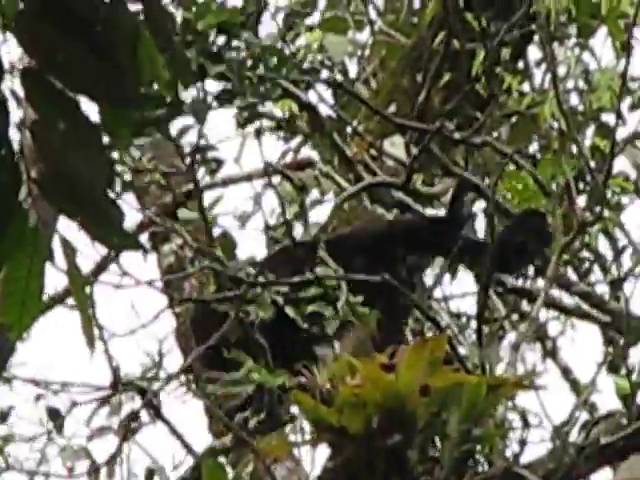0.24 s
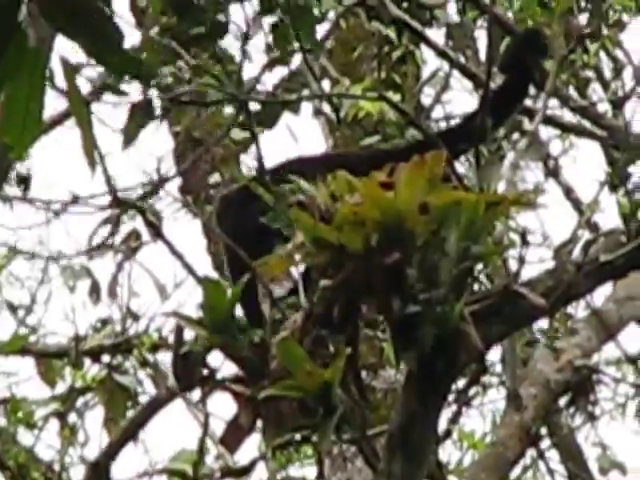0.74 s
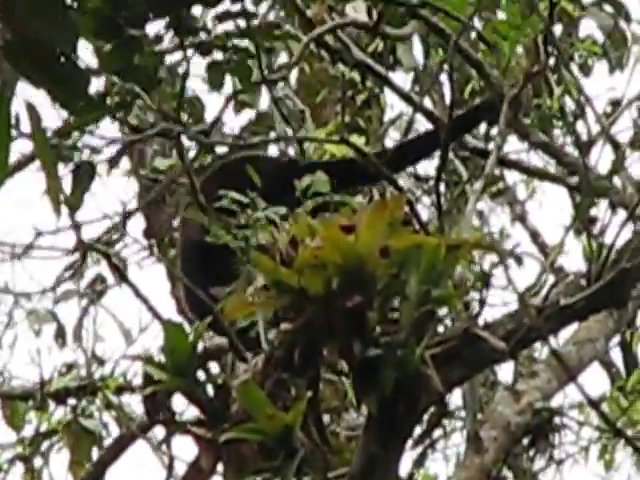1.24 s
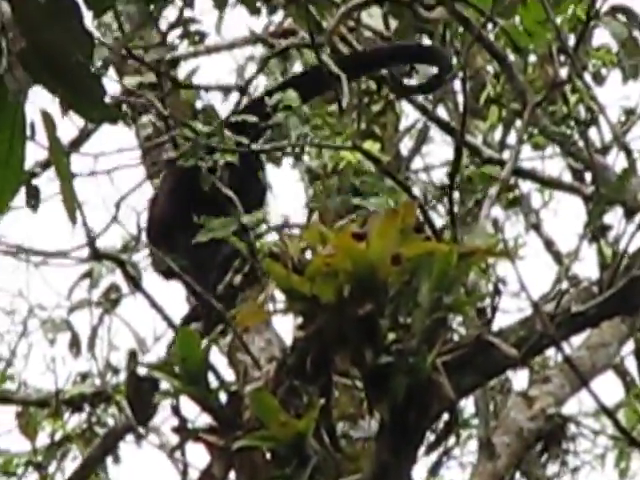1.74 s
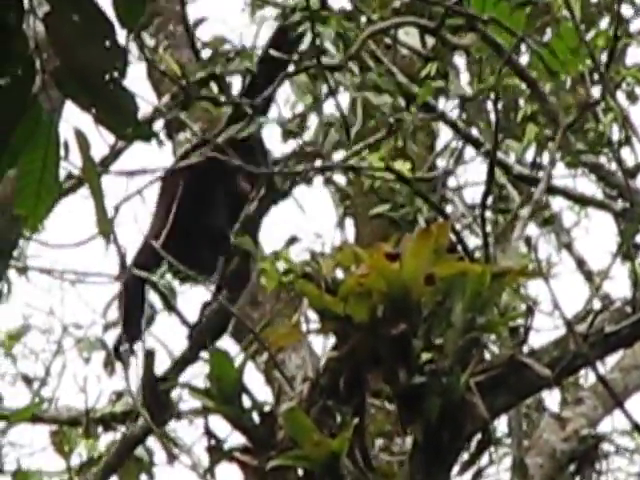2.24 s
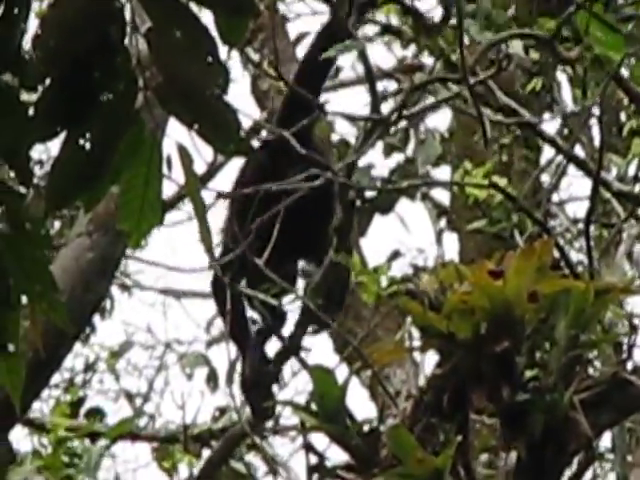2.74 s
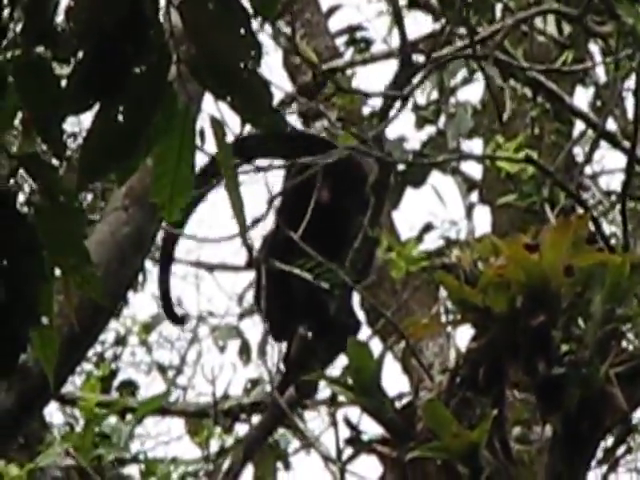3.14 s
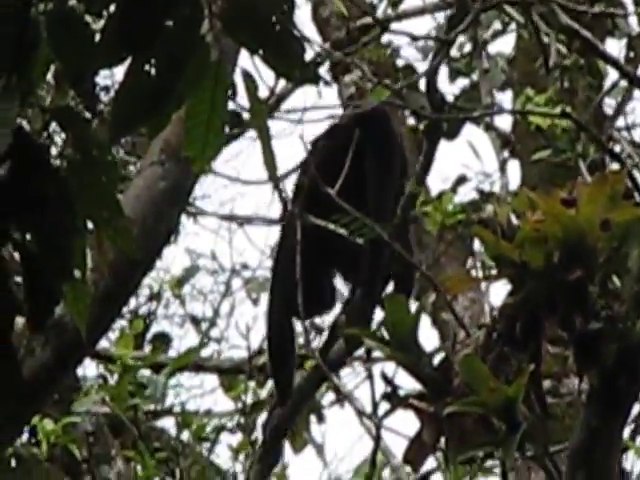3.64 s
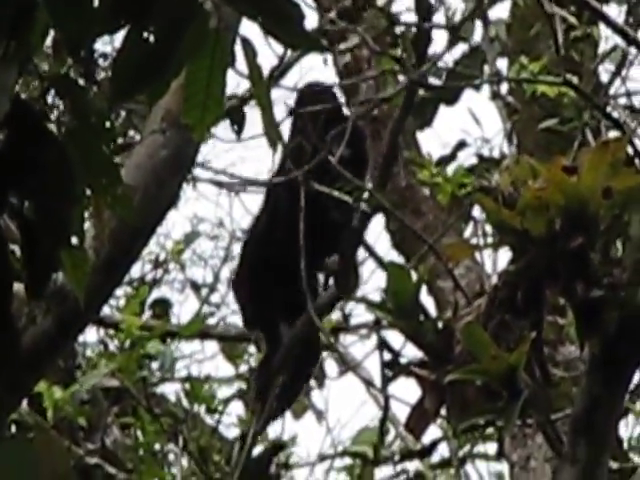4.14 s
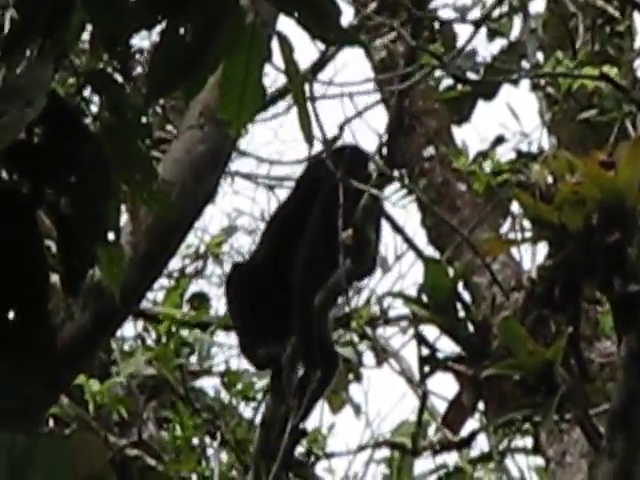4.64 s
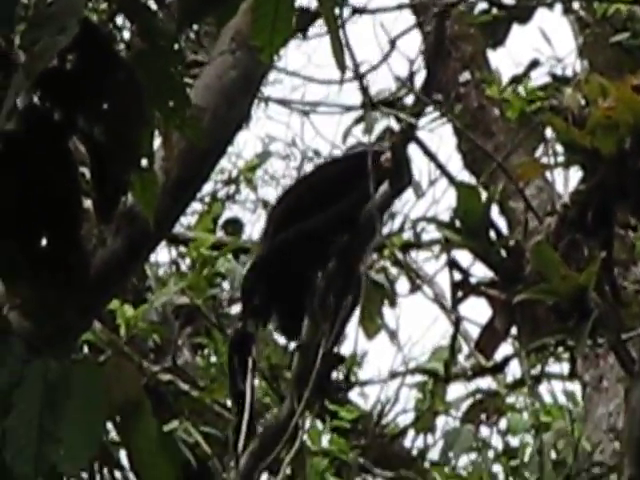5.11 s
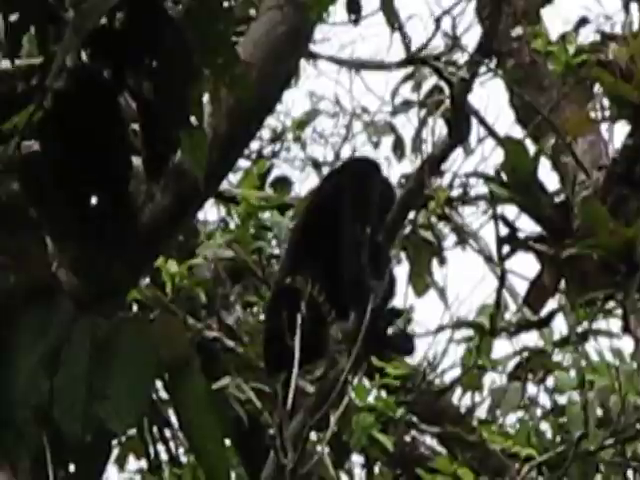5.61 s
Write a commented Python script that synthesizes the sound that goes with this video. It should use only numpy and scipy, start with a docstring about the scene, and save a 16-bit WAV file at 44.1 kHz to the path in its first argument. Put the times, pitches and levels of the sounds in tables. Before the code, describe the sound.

A howler monkey calls from a rainforest tree, a little left of centre, with a short scattered echo from trunks and leaves. The sound opens in the middle of a harsh bark; more raspy, unsteady barks follow at about 0.2, 0.45, 0.75 and 1.2 s, with a short grunt and hoarse ringing overtones. From 1.5 s the animal is quiet, apart from a faint hum near 2.75 s. At 3.3 s a weak hoot starts a new bout; hoots at 3.6 and 3.85 s are stronger, and from 4.1 s full, hollow, cleaner hoots pulse about three times a second to the end, with brief grunts and hums between. A small dry twig crack comes at 4.3 s. Throughout, cicadas make an even, very high hiss, a high cricket trill pulses fast and slowly fades, and a katydid scrapes about five times a second until 5.7 s, over low, soft forest air.

```python
"""A howler monkey calls in a rainforest tree: harsh barks, a pause, then hoots that build up.
Each call mixes a chaotic rasp of the vocal folds with the note of the throat sac; the note is
cleaner where the sac outweighs the rasp. Short grunts, soft hums and extra ringing tones join in.
Shaped noise makes hissing cicadas, a rasping katydid, a snapping twig and forest air.
A pulsing tone makes a trilling cricket, and a fading noise tail makes the echo from the trees."""
import sys
import numpy as np
from scipy import signal
from scipy.fft import rfft, irfft, next_fast_len
from scipy.io import wavfile
from scipy.ndimage import uniform_filter1d, minimum_filter1d, map_coordinates

SR = 44100
rng = np.random.default_rng(int(sys.argv[2]) if len(sys.argv) > 2 else 0)


def wav_out(sig):
    """Save sig, one row per channel (or a flat mono array), as 16-bit PCM at SR to the path in sys.argv[1]."""
    wavfile.write(sys.argv[1], SR, np.round(np.clip(np.atleast_2d(sig).T, -1, 1) * 32767).astype(np.int16))


N = 258867
T = np.arange(N) / SR  # time of every sample (s)


def amp(db):
    """Turn decibels into a plain multiplier."""
    return 10 ** (np.asarray(db) / 20)


def unit(x):
    """Scale a sound to an average (rms) level of 1."""
    return x / np.sqrt(np.mean(x ** 2) + 1e-20)


def along(points, hz):
    """Read a curve of (pitch_hz, value) points on a log pitch axis."""
    point_hz, value = np.transpose(points)
    return np.interp(np.log(hz + 1), np.log(point_hz + 1), value)


def over_time(points):
    """Read a curve of (time_s, value) points at every sample."""
    return np.interp(T, *np.transpose(points))


def wobble(rate):
    """A smooth random curve of rms 1, with about this many random points a second."""
    knots = rng.standard_normal(int(N * rate / SR) + 4)
    return unit(signal.resample(knots, next_fast_len(N))[:N])


def filtered(x, response):
    """Multiply the spectrum of a sound by a response that depends on frequency."""
    size = next_fast_len(N + SR // 2)
    spectrum = rfft(x, size) * response(np.fft.rfftfreq(size, 1 / SR))
    return irfft(spectrum, size)[..., :N]


def coloured(x, spectrum):
    """Colour a sound with (pitch_hz, level_db) points, at rms 1."""
    return unit(filtered(x, lambda hz: amp(along(spectrum, hz))))


def resonate(x, modes):
    """Ring a sound through steep-sided (pitch_hz, width_hz, level_db) resonances, at rms 1."""
    def response(hz):
        total = 0
        for centre_hz, width_hz, db in modes:
            damping = 1.5j * hz * width_hz
            # squaring makes the sides steep
            total = total + amp(db) * (damping / (centre_hz ** 2 - hz ** 2 + damping)) ** 2
        return total
    return unit(filtered(x, response))


def noise_pair(alike):
    """Left and right noise, mixed from a shared and an opposite part to set their likeness."""
    def shares(hz):
        turn = np.arccos(np.clip(along(alike, hz), -1, 1)) / 2
        return np.array([np.cos(turn), np.sin(turn)])
    mid, side = filtered(rng.standard_normal((2, N)), shares)
    return np.array([mid + side, mid - side])


def swell(start, length):
    """A rounded rise and fall, silent outside its length."""
    return np.abs(np.sin(np.pi * np.clip((T - start) / length, 0, 1))) ** 0.32


def cycle(hz):
    """Add up a pitch curve into a running phase."""
    return 2 * np.pi * np.cumsum(hz) / SR


def glide(start, length, start_hz, end_hz, jitter):
    """Phase of a short, unsteady note that goes from one pitch to another."""
    hz = np.interp(T, [start, start + length], [start_hz, end_hz])
    return cycle(hz * (1 + jitter * wobble(160)))


def rough_note(phase, chaos, rate):
    """A tone of rms 1, from pure (chaos 0) to a random flutter (chaos 1)."""
    flutter = np.sqrt(2) * (1 - chaos) + chaos * (wobble(rate) + 1j * wobble(rate))
    return np.real(flutter * np.exp(1j * phase)) / np.hypot(1 - chaos, chaos)


# colour of the forest air: pitch_hz, level_db
FOREST_COLOUR = [(20, -38), (36, -13), (70, -5.5), (160, -4.5), (700, -5.3), (1250, -7), (1900, -12.5),
                 (4600, -9), (5300, -14.5), (9000, -84)]
# likeness of left and right, for the air and the echo: pitch_hz, likeness (1 = the same)
FOREST_LIKENESS = [(100, 1), (1200, 0.74), (4000, 0.14)]


def forest():
    """Leaves and far air are coloured noise; a thin insect whine and a low hum are narrow resonances."""
    breeze = amp(.4 * wobble(3))
    air = amp(-44) * breeze * coloured(noise_pair(FOREST_LIKENESS), FOREST_COLOUR)
    whine = amp(-58) * resonate(rng.standard_normal((2, N)), [(2619, 27, 0)])
    hum = amp(-64) * resonate(rng.standard_normal(N), [(121.2, 3.4, 0)])
    return air + whine + hum


# colour of the hiss: pitch_hz, level_db
CICADA_COLOUR = [(5600, -23.5), (6100, -15.5), (6600, -12), (8000, -1), (9100, 2), (10500, -1.5),
                 (11500, -9), (13000, -23), (15000, -35.5), (16000, -37)]
# loudness of the hiss before the trim: time_s, level_db
CICADA_LOUDNESS = [(0.0, -34.5), (5.87, -34)]


def cicadas(trim_db=4):
    """Countless far insects merge into an even hiss that leans slowly from right to left."""
    # (pitch_hz, likeness of left and right)
    hiss = coloured(noise_pair([(6000, -0.00063), (9000, -0.4), (13000, 0.094)]), CICADA_COLOUR)
    lean_db = np.interp(T, [0, 5.87], [-.3, .5])
    return hiss * amp(over_time(CICADA_LOUDNESS) + trim_db + np.array([lean_db, -lean_db]))


# loudness of the trill before the trim: time_s, level_db
CRICKET_LOUDNESS = [(0.0, -43), (1.75, -46), (5.87, -52.5)]
# moments near which the trill rests briefly: time_s
CRICKET_PAUSES = [.6, 1.23, 2.34, 2.65]


def cricket(rate_hz=52.3, pitch_hz=5010, trim_db=3):
    """A trill of quick, ringing wing strokes with brief rests: a high tone that pulses."""
    stroke_phase = cycle(rate_hz * (1 + 0.0079 * wobble(4.38)))
    strokes = 0.21 + 0.73 * (.5 + .5 * np.sin(stroke_phase)) ** 2
    rests = sum(swell(s - .04, 0.056) for s in CRICKET_PAUSES)
    playing = np.clip(1 - rests, 0, 1)
    phase = cycle(pitch_hz * (1 + 0.00594 * wobble(300)))
    # left and right are a quarter cycle apart
    tone = np.sqrt(2) * np.array([np.sin(phase), np.cos(phase)])
    wings = tone * amp(1.5 * wobble(50))
    return wings * strokes * playing * amp(over_time(CRICKET_LOUDNESS) + trim_db)


# pace of the wings: time_s, strokes so far (count)
KATYDID_PACE = [(.07, 0), (2.93, 15), (4.14, 21), (5.68, 29)]


def katydid(sharpness=3.1, stroke_db=-45.5, back_db=-54):
    """Broad scraping strokes, about five a second, with a thinner, higher back stroke between them."""
    turn = np.pi * over_time(KATYDID_PACE)
    playing = (T > KATYDID_PACE[0][0] - .02) * (T < KATYDID_PACE[-1][0] + .02)
    colour = [(2600, -48), (3400, -3), (3900, 1), (4250, 0), (4700, -7), (5500, -53)]  # (Hz, dB)
    scrape = coloured(rng.standard_normal((2, N)), colour)
    back = resonate(rng.standard_normal((2, N)), [(4530, 200, 0)])
    strokes = amp(stroke_db) * np.abs(np.cos(turn)) ** (2 * sharpness) * scrape
    back_strokes = amp(back_db) * np.sin(turn) ** 4 * back
    return uniform_filter1d(1.0 * playing, SR // 20) * (strokes + back_strokes)


# how long the echo takes to fade by 60 dB: pitch_hz, fade_s
TREE_FADE = [(350, 1), (900, 0.66), (5000, 0.45)]


def trees(x):
    """Trunks and leaves scatter the sound back, differently to each side in the treble."""
    noise = noise_pair(FOREST_LIKENESS)[:, :SR]
    hz, t, grid = signal.stft(noise, SR, nperseg=256)
    fade = amp(-60 * t / along(TREE_FADE, hz)[:, None])
    tail = signal.istft(grid * fade, SR, nperseg=256)[1]
    late = np.pad(x, (SR // 80, 0))[None]  # 12.5 ms on the way
    return signal.fftconvolve(late, tail / np.linalg.norm(tail[0]), axes=1)[:, :N]


def twig(start=4.327, db=-32, fade_s=0.048):
    """A small dry crack in the branches: noise through two wood resonances, fading 60 dB in fade_s."""
    age = np.maximum(T - start, 0)
    wood = resonate(rng.standard_normal(N), [(1989, 590, 14), (2589, 870, -1)])
    return amp(db - 60 * age / fade_s) * (T > start) * wood


# short voiced grunts: start_s, length_s, start_pitch_hz, end_pitch_hz, level_db
GRUNT_NOTES = [(0.115, 0.17, 252, 258, -33.5), (4.366, 0.076, 266, 286, -29),
               (4.677, 0.06, 278, 283.4, -28), (5.03, 0.074, 264, 247.2, -32),
               (5.605, .07, 240, 227.8, -36)]
# overtones of a grunt: multiple of its pitch, level_db
GRUNT_OVERTONES = [(1, 9.5), (2, 13.5), (3, 14), (4, -17.5), (5, -22)]
# soft hums of the sac: start_s, length_s, start_pitch_hz, end_pitch_hz, level_db
SAC_HUMS = [(2.751, 0.087, 200, 214, -42), (4.373, 0.082, 338, 310, -25), (4.703, .08, 331, 319, -24.5)]


def grunts():
    """Short hoarse grunts stack unsteady overtones and noise; soft hums of the sac are single tones."""
    out = np.zeros(N)
    for s, length, start_hz, end_hz, db in GRUNT_NOTES:
        phase = glide(s, length, start_hz, end_hz, jitter=0.0248)
        voice = sum(amp(level + 4.1 * wobble(70)) * np.sin(k * phase) for k, level in GRUNT_OVERTONES)
        hoarse = coloured(rng.standard_normal(N), HOOT_THROAT_COLOUR)
        out += amp(db) * swell(s, length) * (unit(voice) + 0.14 * hoarse)
    for s, length, start_hz, end_hz, db in SAC_HUMS:
        tone = unit(np.sin(glide(s, length, start_hz, end_hz, jitter=0.0206)))
        out += amp(db) * swell(s, length) * tone
    return out


# extra ringing tones in the barks and the first grunt; the one near 900 Hz is a steady mouth resonance:
# start_s, length_s, start_pitch_hz, end_pitch_hz, level_db
EXTRA_TONES = [(-.03, 0.077, 3530, 3350, -43.5), (-.02, 0.053, 2150, 2060, -42),
               (0.124, .12, 1038, 857, -33.5), (.235, .085, 2080, 2310, -45.5),
               (0.21, 0.082, 3070, 3250, -49.5), (0.467, 0.12, 903, 900, -28),
               (0.528, 0.146, 3720, 3630, -53), (.823, 0.12, 4965, 4866, -47.5),
               (1.24, 0.094, 4380, 3950, -42.5)]


def ringing_tones():
    """Extra hoarse tones, most sliding, one steady near 900 Hz; higher ones flutter more, up to a limit."""
    out = np.zeros(N)
    for s, length, start_hz, end_hz, db in EXTRA_TONES:
        phase = glide(s, length, start_hz, end_hz, jitter=0.029)
        out += amp(db) * swell(s, length) * rough_note(phase, chaos=min(start_hz / 3000, .75), rate=200)
    return out


def arch(age, length, attack, rise_db, fall_db, bend):
    """Gain of a call that climbs to a crest and falls away; silent outside softened edges."""
    rising = np.clip(1 - age / attack, 0, 1)
    falling = np.clip((age - attack) / max(length - attack, .01), 0, 1)
    sounding = uniform_filter1d(1.0 * (age >= 0) * (age <= length), SR // 80)
    return sounding * amp(-rise_db * rising ** 2 - fall_db * falling ** bend)


# the sac starts and ends this far under its crest (dB); the bend shapes each fall
SAC_RISE_DB, SAC_FALL_DB, SAC_BEND, RASP_BEND = 19.5, 21, 1.68, 1.365
SCOOP_SHARE, SCOOP_S = .66, .016  # the pitch slides at this share of the sac's attack, this quickly
SAG_HZ_PER_S = 170  # the pitch sinks after the crest
SHAKE_DB, SHAKE_RATE = 1.33, 40  # unsteady push of the sac (dB, random points a second)


def controls(calls, rasp_rise_db, rasp_fall_db):
    """Sac pitch, sac gain, rasp gain and progress (0-1) of the calls; the pitch scoops, settles and sags."""
    hz, sac, rasp = np.full(N, 1.0 * calls[0][2]), np.zeros(N), np.zeros(N)
    for s, length, opening_hz, settled_hz, sac_db, sac_attack, rasp_db, rasp_attack in calls:
        age = T - s
        sac += amp(sac_db) * arch(age, length, sac_attack, SAC_RISE_DB, SAC_FALL_DB, SAC_BEND)
        rasp += amp(rasp_db) * arch(age, length, rasp_attack, rasp_rise_db, rasp_fall_db, RASP_BEND)
        settled = .5 + .5 * np.tanh((age - SCOOP_SHARE * sac_attack) / SCOOP_S)
        sag = SAG_HZ_PER_S * np.clip(age - sac_attack, 0, length)
        call_hz = opening_hz + (settled_hz - opening_hz) * settled - sag
        hz = np.where(age > -SCOOP_S, call_hz, hz)
    edges = np.ravel([(s, s + length) for s, length, *_ in calls])
    progress = np.interp(T, edges, np.arange(len(edges)) % 2)
    return hz, sac * amp(SHAKE_DB * wobble(SHAKE_RATE)), rasp, progress


def folds(rate_hz, jitter, air):
    """Heavy vocal folds slap at an uneven rate; each slap lets a puff of air through."""
    turns = np.cumsum(rate_hz * np.exp(jitter * wobble(110))) / SR
    slaps = np.diff(np.floor(turns), prepend=0)
    puffs = rng.standard_normal(N) * np.exp(-2 * (turns % 1))

    def sac_delay(hz):
        """The sac spreads each slap over several milliseconds."""
        return np.exp(-2j * np.pi * hz * .005 * np.minimum(hz / 1000, 1))
    return unit(filtered(slaps, sac_delay)) + air * unit(puffs)


def bout(calls, throat, mouth, rough, jitter, air, wander, open_hz, closed_hz, sac_db, rasp_db, jaw_db,
         mouth_db, octave_db, rasp_rise_db, rasp_fall_db, mouth_lift):
    """The folds rasp through the throat while the sac sings, the cleaner the more it outweighs the rasp."""
    hz, sac, rasp, progress = controls(calls, rasp_rise_db, rasp_fall_db)
    chaos = np.clip(rough * rasp / (sac + rasp + 1e-6), 0, 1)
    phase = cycle(hz * (1 + wander * chaos * wobble(45)))
    note = amp(sac_db) * sac * rough_note(phase, chaos, rate=97)
    effort = np.sqrt(np.abs(sac * rasp))
    octave = amp(octave_db) * effort * rough_note(2 * phase, chaos=0.8, rate=59)
    # the folds close about once in three swings of the sac
    source = folds(hz / 3, jitter, air)
    growl = amp(rasp_db) * rasp * coloured(source, throat)
    # the jaw opens early in a call, less for soft ones, and its resonance sinks as it closes
    nearby_peak = -minimum_filter1d(-np.abs(rasp), SR // 3)  # loudest rasp in a third of a second
    strength = nearby_peak / rasp.max()
    opening = np.sin(np.pi * (1 + 3 * progress) / 4)
    jaw_hz = (closed_hz + (open_hz - closed_hz) * opening) * strength ** 0.16
    jaw_phase = cycle(jaw_hz * (1 + 0.0154 * wobble(25)))
    jaw = amp(jaw_db) * rasp * rough_note(jaw_phase, chaos=0.43, rate=70)
    # the mouth resonances lift in mid-call (read faster) and stand out under a hard push
    lift = 1 + mouth_lift * (np.sin(np.pi * progress) - .85) * (effort > 1e-6)
    ring = map_coordinates(resonate(source, mouth), [np.cumsum(lift)], mode="mirror")
    return note + octave + growl + jaw + amp(mouth_db) * effort ** 1.374 * ring


# hoots; levels are before the mix in hoots(): start_s, length_s, opening_pitch_hz, settled_pitch_hz,
# sac_level_db, sac_attack_s, rasp_level_db, rasp_attack_s
HOOT_CALLS = [(3.305, .115, 320.1, 344.8, -31.5, .028, -41, 0.041),
              (3.59, 0.17, 340.7, 348, -25, 0.053, -35, .085),
              (3.855, .195, 354.9, 329.9, -25, 0.061, -32, 0.098),
              (4.112, 0.23, 317.6, 368.3, -15.5, 0.13, -25, 0.055),
              (4.46, 0.21, 338, 371.2, -13.5, .10, -25, 0.035),
              (4.785, .22, 341.8, 375.4, -12, .092, -24, 0.038),
              (5.105, .235, 358.5, 373.7, -13, .10, -23.5, 0.053),
              (5.445, .19, 342.7, 378.7, -11, .098, -25, 0.033),
              (5.835, 0.23, 360, 379, -16, 0.043, -27.5, 0.041)]
# throat colour of the hooting rasp and of the grunts' hoarseness: pitch_hz, level_db
HOOT_THROAT_COLOUR = [(110, -45), (180, -10.5), (240, -8.5), (310, 3.5), (540, 5), (640, -2.5), (860, -2.5),
                      (1020, -10), (1350, -11), (1600, -28.5), (6000, -50)]
# upper resonances of the hooting mouth: pitch_hz, width_hz, level_db
HOOT_MOUTH_MODES = [(1338, 33, 7), (2013, 44, 7.5), (3173, 107, 5), (5150, 480, -6.5)]


def hoots():
    """Hoots that build up: the sac's steadier note stands well over the rasp."""
    return bout(HOOT_CALLS, HOOT_THROAT_COLOUR, HOOT_MOUTH_MODES,
                rough=1.0, jitter=.2, air=0.99, wander=0.009, open_hz=807, closed_hz=687,
                sac_db=-0.5, rasp_db=-1, jaw_db=-5.5, mouth_db=-8, octave_db=-11.5,
                rasp_rise_db=11, rasp_fall_db=21.5, mouth_lift=.015)


# barks; levels are before the mix in barks(): start_s, length_s, opening_pitch_hz, settled_pitch_hz,
# sac_level_db, sac_attack_s, rasp_level_db, rasp_attack_s
BARK_CALLS = [(-.06, .17, 312.7, 358.5, -21.5, 0.092, -22, 0.075),
              (.195, .175, 330.9, 348, -17.5, .088, -24, .065),
              (.457, .235, 399, 403.4, -21, 0.054, -22.5, 0.0895),
              (.745, .315, 395.1, 402.2, -22.5, .15, -21.5, 0.136),
              (1.21, .24, 420.2, 375.9, -21, .12, -25, 0.086)]
# throat colour of the barking rasp: pitch_hz, level_db
BARK_THROAT_COLOUR = [(120, -55), (240, -7), (320, 2.5), (440, 8), (540, 1), (640, 3.5), (900, -12),
                      (1060, -12.5), (1400, -15.5), (1650, -50), (6000, -56)]
# upper resonances of the barking mouth: pitch_hz, width_hz, level_db
BARK_MOUTH_MODES = [(1357, 59, 11), (2065, 180, -4), (3180, 490, -13), (4860, 770, -5)]


def barks():
    """Harsh barks: a strong rasp makes the sac's pitch wander and flutter."""
    return bout(BARK_CALLS, BARK_THROAT_COLOUR, BARK_MOUTH_MODES,
                rough=.9, jitter=.09, air=0.67, wander=.12, open_hz=885, closed_hz=679,
                sac_db=0, rasp_db=-1, jaw_db=-9, mouth_db=-9.5, octave_db=-9,
                rasp_rise_db=15, rasp_fall_db=22.5, mouth_lift=.05)


def scene():
    """The monkey and twig, slightly louder on the left, with their echo and the forest around them."""
    near = barks() + ringing_tones() + hoots() + grunts() + twig()
    echo_colour = [(350, -17), (900, -11.5), (3000, 3)]  # (Hz, dB)
    echo = filtered(trees(near), lambda hz: amp(along(echo_colour, hz)))
    direct = near * amp([[.8], [-.8]])
    return direct + echo + cicadas() + cricket() + katydid() + forest()


def record(dry, top_hz=15600):
    """Keep only the sound below the top frequency."""
    return filtered(dry, lambda hz: hz < top_hz)


dry = scene()
out = record(dry)
wav_out(out)
```